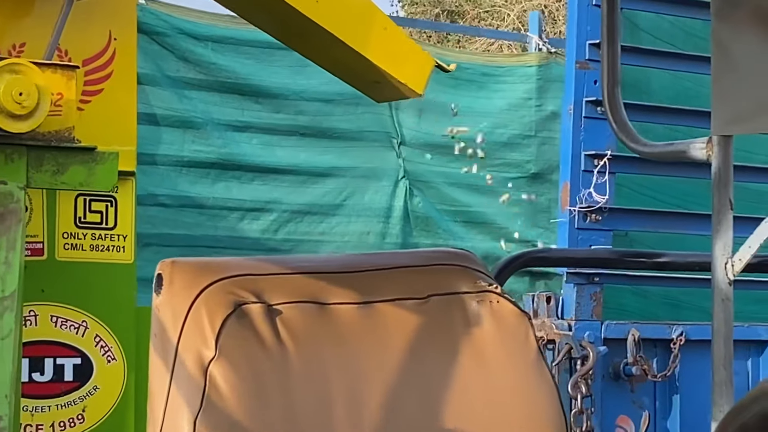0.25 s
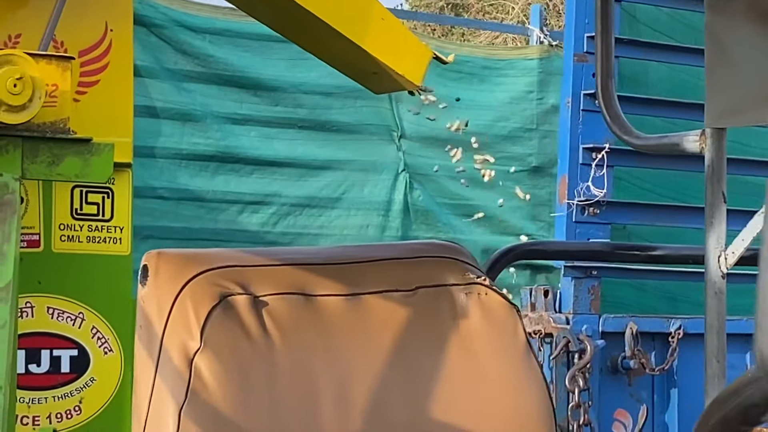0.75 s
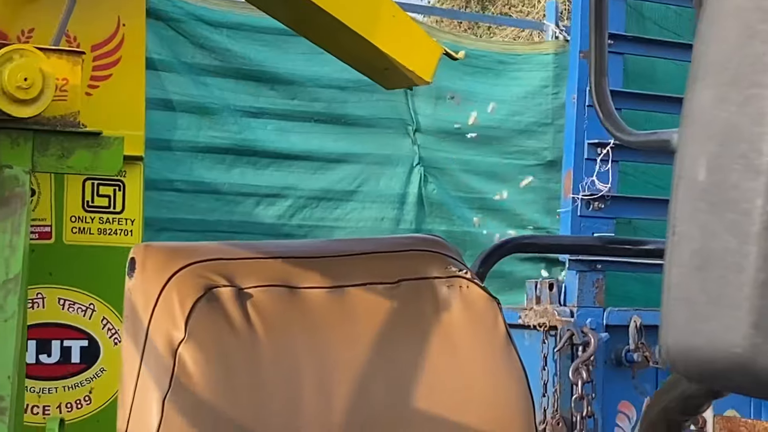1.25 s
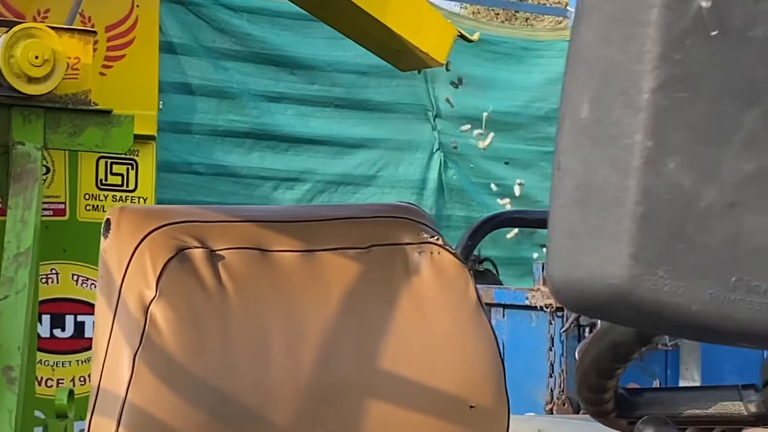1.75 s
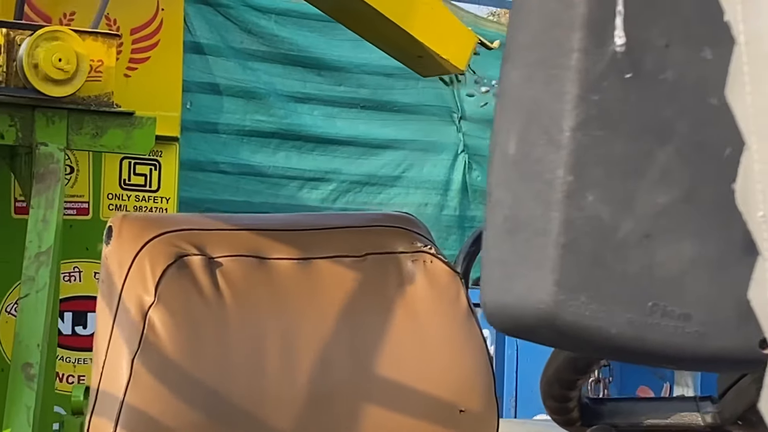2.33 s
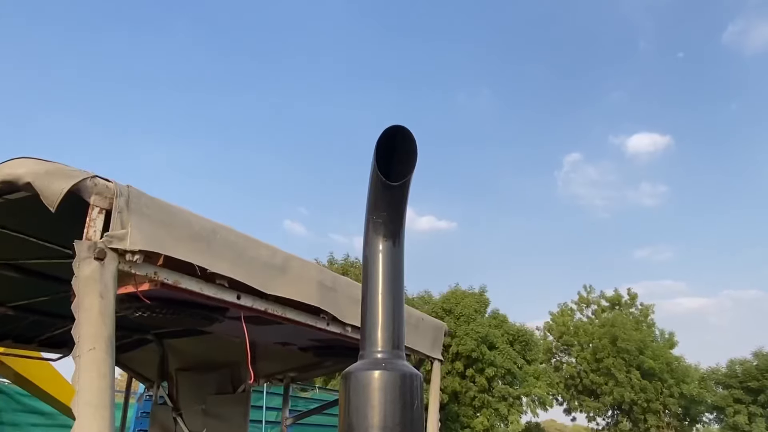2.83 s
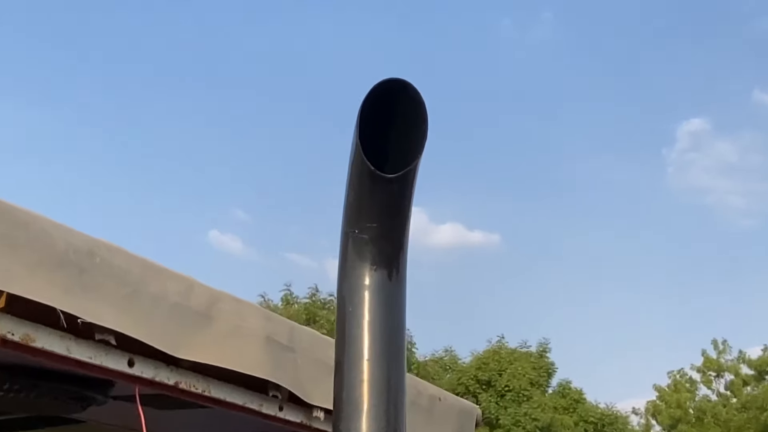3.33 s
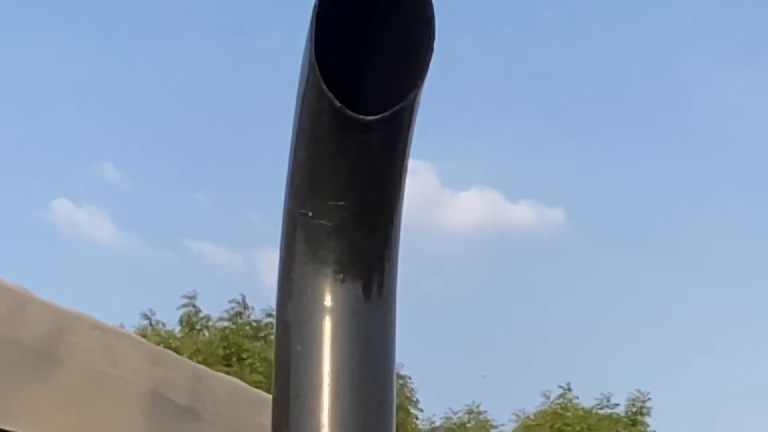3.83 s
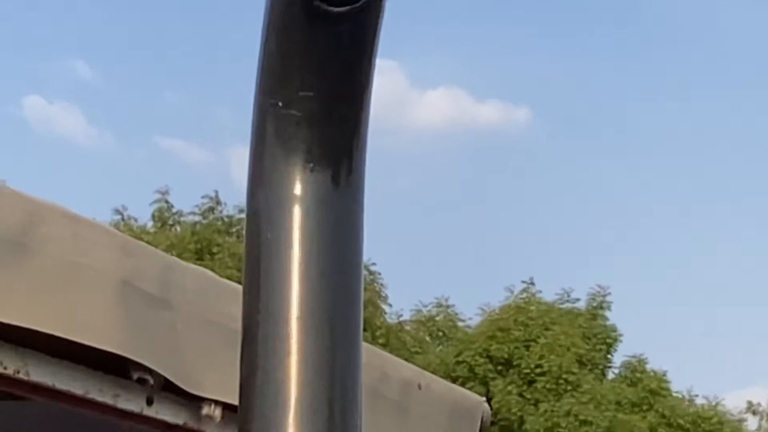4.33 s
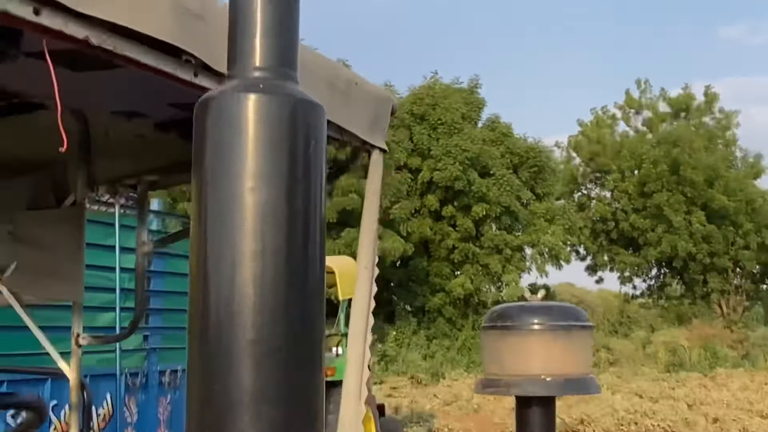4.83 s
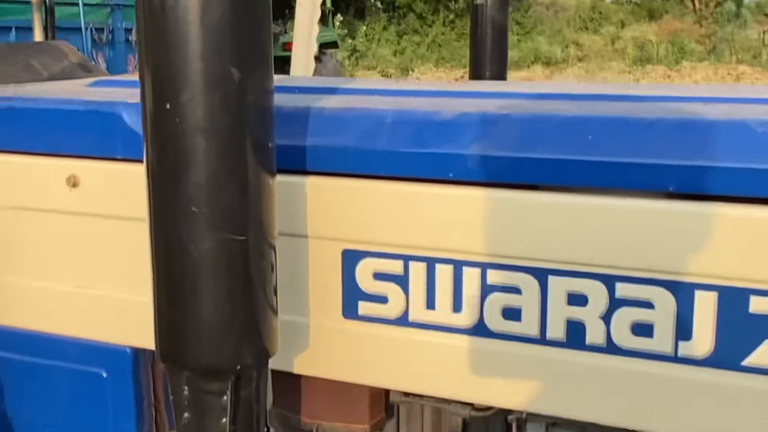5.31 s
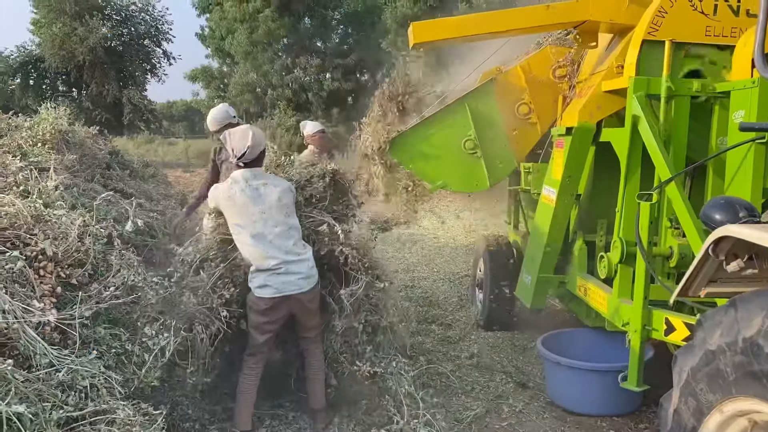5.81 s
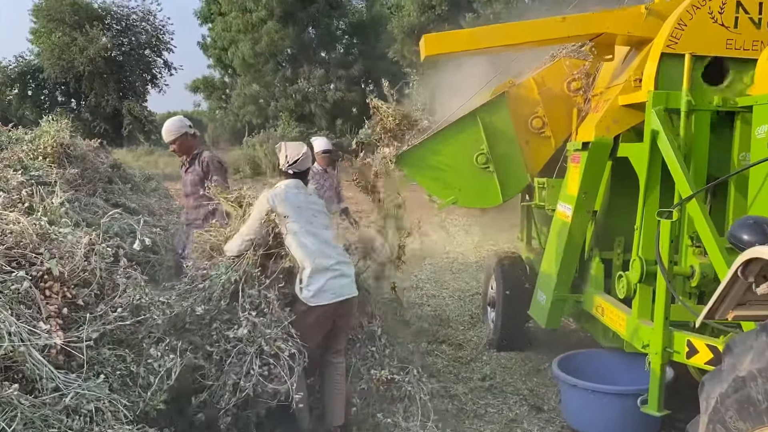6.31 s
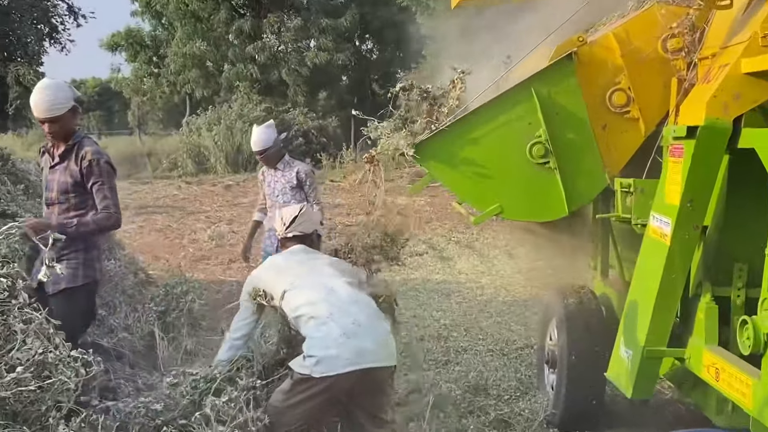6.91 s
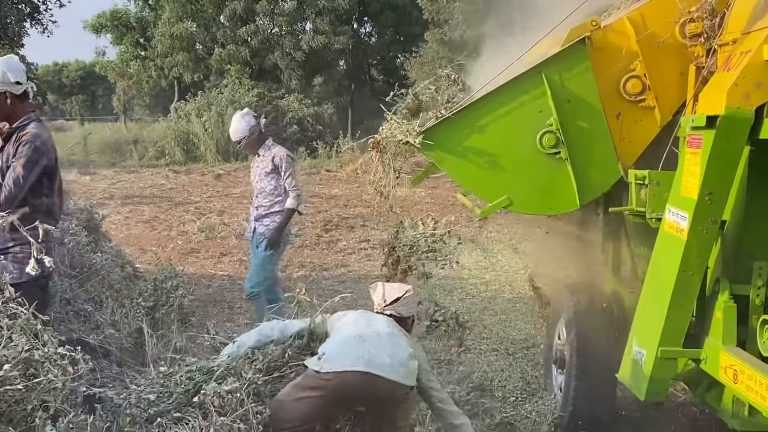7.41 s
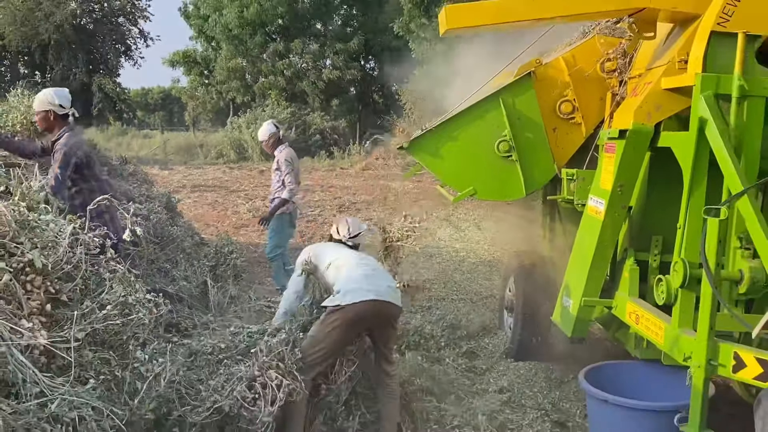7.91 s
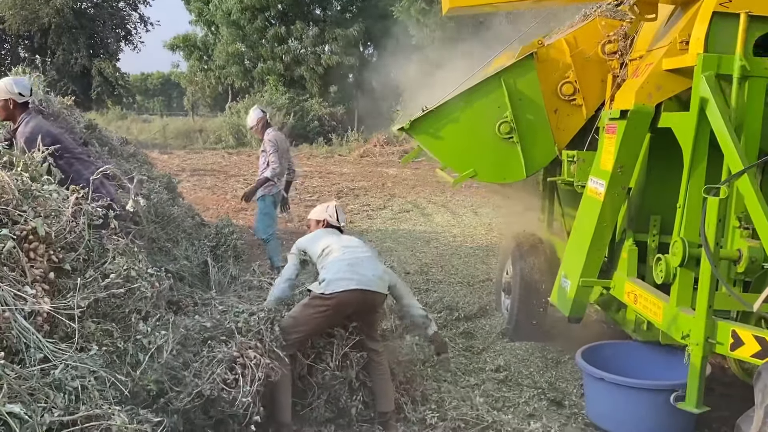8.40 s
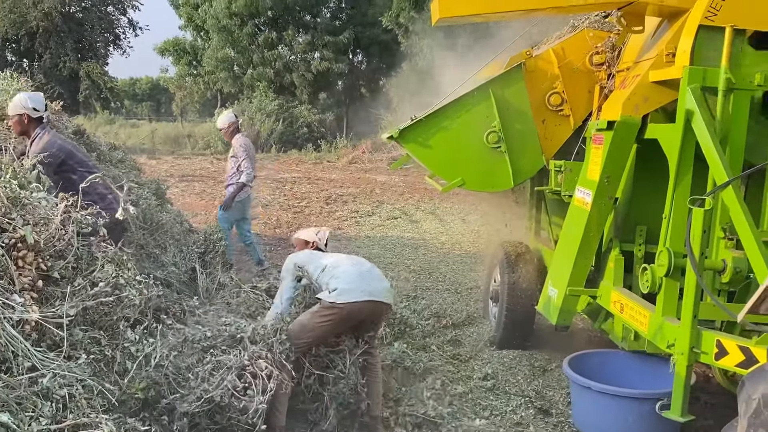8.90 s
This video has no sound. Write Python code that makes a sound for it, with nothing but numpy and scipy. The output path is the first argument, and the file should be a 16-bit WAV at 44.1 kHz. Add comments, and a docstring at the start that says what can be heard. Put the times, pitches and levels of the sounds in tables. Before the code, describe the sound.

A tractor diesel hammers under throbbing load while a crop thresher roars and hums, heard from three spots split by tiny gaps, dry stalks rustling late.

```python
"""A diesel tractor drives a crop thresher in a field, heard from three spots in turn with a short silence
between: beside the seat, near the exhaust stack, and out by the feed hopper. Three cylinders fire under a
throbbing load: each firing thumps the exhaust pipe, knocks the engine block, puffs hiss and ticks the valve gear.
The blower hums a little below twice the firing rate and beats with it.
Drum and crop are patchy noise with ringing sheet metal; near the end, armfuls of dry stalks rustle."""
import sys
import numpy as np
from scipy import signal
from scipy.fft import rfft, irfft, next_fast_len
from scipy.io import wavfile
from scipy.ndimage import uniform_filter1d, map_coordinates

SR = 44100
rng = np.random.default_rng(int(sys.argv[2]) if len(sys.argv) > 2 else 0)


def bounce(signal):
    """Save signal as a 16-bit WAV file at the path given by the first command-line argument."""
    frames = np.transpose(np.atleast_2d(signal))
    limited = np.clip(frames, -1, 1)
    pcm = np.round(limited * 32767).astype(np.int16)
    wavfile.write(sys.argv[1], SR, pcm)


N = 403515
RUN_UP_S = .3  # the machines already run this long before each spot is heard


def amp(db):
    """Turn decibels into a plain gain."""
    return 10 ** (np.asarray(db) / 20)


def unit(x):
    """Scale a signal to an rms of one."""
    return x / np.sqrt(np.mean(x ** 2) + 1e-20)


def along(table, column, hz):
    """Read one column of a table that starts with pitch, on a log pitch axis."""
    rows = np.array(table)
    return np.interp(np.log(hz + 1), np.log(rows[:, 0] + 1), rows[:, column])


def curves(rows, t):
    """Draw one curve over time for each column after the first."""
    seconds, *columns = np.transpose(rows)
    return [np.interp(t, seconds, column) for column in columns]


def wobble(t, rate):
    """A smooth random curve with rate knots a second."""
    position = (t - t[0]) * rate
    knots = rng.standard_normal(len(t) // 200)
    return map_coordinates(knots, [position])


def noise(t):
    """Two unrelated noises: the direct and the diffuse part."""
    return rng.standard_normal((2, len(t)))


def filtered(x, response):
    """Colour x with a complex response of frequency."""
    length = next_fast_len(x.shape[-1] + SR // 4)
    spectrum = rfft(x, length) * response(np.fft.rfftfreq(length, 1 / SR))
    return irfft(spectrum, length)[..., :x.shape[-1]]


def modes(table, spot):
    """Response of a body with several resonances: each rings on after a push, with alternating sign."""
    def resonance(f, row):
        centre_hz, width_hz = row[:2]
        return amp(row[2 + spot]) * 1j * f * width_hz / (centre_hz ** 2 - f * f + 1j * f * width_hz)
    return lambda f: sum((-1) ** k * resonance(f, row) for k, row in enumerate(table))


# Resonances of the exhaust pipe, before mouth and silencer:
# pitch_hz, width_hz, seat_db, stack_db, hopper_db
PIPE_MODES = [(106.5, 10.0, -0.5, 0.2, -2.1), (63.7, 10.0, -8.7, -8.5, -13.6),
              (144.1, 42.5, -11.5, -11.1, -13.5), (136.8, 68.0, -12.3, -11.2, -14.0),
              (259.0, 10.0, -21.3, -21.7, -24.1)]
# Upper engine orders, carried by the chassis; levels are rms before the wobble:
# multiple of firing rate, seat_db, stack_db, hopper_db
CHASSIS_ORDERS = [(7, -33, -31, -35), (8, -38, -33, -48), (9, -31, -32, -32), (10, -38, -43, -37),
                  (11, -41, -41, -38), (12, -39, -40, -44), (13, -40, -39, -45), (14, -42, -44, -47),
                  (15, -43, -42, -43), (16, -40, -40, -41), (17, -44, -43, -44)]


def exhaust(t, firing, spot):
    """Each firing's pressure pulse rings the pipe; the mouth loses deep bass, the silencer cuts the top."""
    fired = np.diff(np.floor(firing), prepend=np.floor(firing[0]))
    size = amp(0.7 * wobble(t, 30.16)) / np.gradient(firing) / 2

    def pipe(f):
        mouth = (1j * f / 38 / (1 + 1j * f / 38)) ** 2
        silencer = 1 / (1 + (f / 199) ** 30)
        return modes(PIPE_MODES, spot)(f) * mouth * silencer

    upper = 0
    for row in CHASSIS_ORDERS:
        level = amp(row[1 + spot] + 2.6 * wobble(t, 4.03))
        upper = upper + level * np.cos(2 * np.pi * row[0] * (firing - .012))
    return filtered(fired * size, pipe) + np.sqrt(2) * upper


# Firings of a set size instead of a random one; each sound multiplies these by its own boost:
# time_s, ring_size_db, hiss_size_db
SET_FIRINGS = [(0.097, 5.5, 4), (0.626, 3, -3), (0.858, 2, -3), (1.023, 7.5, -3), (1.486, 3.5, -2),
               (2.014, 6, -1), (2.212, 1.5, 4.5), (3.069, -2, 2), (3.168, 7, 4), (3.367, 6, 2),
               (3.466, 4, -0.5), (3.532, 1, -2), (3.631, 3.5, 1), (3.863, 3.5, 1), (3.896, 4, 1.5),
               (4.095, 1.5, 2), (4.393, -2, 1), (4.459, 1.5, 2), (4.658, 3.5, -1), (4.856, 4.5, 2.5),
               (4.956, 4, 0), (6.609, 8, -3), (7.47, 7.5, -1), (8.297, 8, -3), (8.363, 6, -2),
               (8.562, 7, 2), (8.827, 9, -2)]


def burst(t, firing, column, rise, fall, scatter_db, boost, cylinder_db=(0, 0, 0)):
    """Envelope that swells before each firing and dies after it; rise and fall are in firing periods."""
    count = np.floor(firing + .25)  # the swell may begin a quarter period early
    since = firing - count
    shape = np.where(since < 0, np.exp(-(since / rise) ** 2), np.exp(-np.abs(since) / fall))
    size_db = scatter_db * rng.standard_normal(int(count[-1]) + 2)
    for row in SET_FIRINGS:
        if t[0] < row[0] < t[-1]:
            size_db[round(np.interp(row[0], t, firing))] = boost * row[column]
    which = count.astype(int)
    return unit(shape) * amp(size_db[which] + np.asarray(cylinder_db)[which % 3])


# Resonances of the engine block, relative levels: pitch_hz, width_hz, seat_db, stack_db, hopper_db
BLOCK_MODES = [(498, 53, -1, -4, -22), (677, 71, -16, 1.5, -8), (757, 71, -7, 2.5, -13),
               (1212, 107, -2, -0.5, 0), (1810, 65, 0, -0.5, 3), (1924, 29.6, 4, 2.5, 8.5),
               (2800, 1150, -26, -15.5, -22.5), (3330, 270, -36.5, -23, -50.5)]
# Each cylinder knocks in its own colour: pitch_hz, first_db, second_db, third_db
CYLINDER_COLOUR = [(480, 1.5, -4, 1.5), (720, -6, 4, -1), (1230, .7, -1.5, .7), (1342, 4, -7, -7),
                   (1800, 1, -.7, -.3), (5000, .3, .3, -.3)]
# Gain at each firing, one row each for seat, stack, hopper: ring_db, hiss_db
FIRING_GAIN = [(9.6, -13), (13.8, -1.5), (12.1, -24)]


def block_ring(t, firing, ring_db, spot):
    """A burst of noise at each firing shakes the block into its resonances, coloured by cylinder."""
    envelope = burst(t, firing, column=1, rise=0.084, fall=0.34, scatter_db=1.5, boost=0.56)
    rattle = noise(t) * amp(ring_db) * envelope
    cylinder = np.floor(firing + .25) % 3
    ring = 0
    for c in range(3):
        colour = lambda f: modes(BLOCK_MODES, spot)(f) * amp(along(CYLINDER_COLOUR, 1 + c, f))
        ring = ring + filtered(rattle * (cylinder == c), colour)
    return amp(FIRING_GAIN[spot][0]) * ring


# Gas ringing in the cylinder sinks in pitch as the piston falls; pitches before the random detune:
# start_hz, end_hz, glide_s
PING_GLIDE = (1960, 1725, .0035)
# Ping level against the block ring level: seat_db, stack_db, hopper_db
PING_LEVEL = [-6.5, -5, -10.5]


def ping(t, firing, ring_db, spot):
    """Ringing gas gives a short falling tone at each firing, at a slightly new pitch and phase."""
    start_hz, end_hz, glide_s = PING_GLIDE
    count = np.floor(firing + .25)
    # seconds since the ping began, a little before the firing
    since = np.maximum((firing - count + 0.0585) / np.gradient(firing, t), 0)
    detune, phase = rng.standard_normal((int(count[-1]) + 1, 2))[count.astype(int)].T
    cycles = end_hz * since + (start_hz - end_hz) * glide_s * (1 - np.exp(-since / glide_s))
    tone = np.sin(2 * np.pi * (cycles * (1 + 0.029 * detune) + phase))
    tone = tone * burst(t, firing, column=1, rise=0.066, fall=0.26, scatter_db=2.0, boost=1.8)
    return amp(ring_db + PING_LEVEL[spot]) * tone * [[1], [.5]]  # direct, diffuse


# Colour of the hiss at each firing: pitch_hz, gain_db
PUFF_COLOUR = [(300, 11), (1000, 6), (3500, -7), (5300, 5.5), (6300, 0), (7500, 7.5), (9500, -1),
               (15500, -12)]


def hiss_puffs(t, firing, hiss_db, spot):
    """Each firing lets out a puff of coloured noise."""
    envelope = burst(t, firing, column=2, rise=.09, fall=.27, scatter_db=2.3, boost=1.4)
    puffs = noise(t) * amp(hiss_db) * envelope
    return amp(FIRING_GAIN[spot][1]) * filtered(puffs, lambda f: amp(along(PUFF_COLOUR, 1, f)))


def struck(t, firing, hz):
    """Noise; a low tick also gets one sharp blow of either sign a firing, a little early or late."""
    x = noise(t)
    late = .03 * wobble(t, 30)  # in firing periods
    at = np.flatnonzero(np.diff(np.floor(firing + late)) > 0)
    # 28 dB above the noise, only for ticks below 1500 Hz
    x[0, at] += amp(28) * rng.choice([-1, 1], len(at)) * (hz < 1500)
    return unit(x)


# Exhaust bark and valve gear ticks, relative levels: pitch_hz, width_hz, seat_db, stack_db, hopper_db
TICK_MODES = [(700, 77, 6.5, 12, 4), (1260, 120, -19, 2, -6), (1345, 21, 19.5, 12, 19),
              (2250, 240, -6, 4, -10), (2630, 410, 0.2, 1, 3), (3420, 260, -6, 4.5, -17),
              (5320, 1300, -8, -3, -5), (7100, 1200, -4, -5, -14)]


def bark_and_ticks(t, firing, hiss_db, spot):
    """Each firing strikes the bark and tick resonances, each with its own strength."""
    ticks = 0
    for row in TICK_MODES:
        cylinder_db = [along(CYLINDER_COLOUR, 1 + c, row[0]) for c in range(3)]
        strike = struck(t, firing, row[0]) * amp(hiss_db)
        envelope = burst(t, firing, column=2, rise=0.1, fall=0.29, scatter_db=2.2, boost=0.84,
                         cylinder_db=cylinder_db)
        ticks = ticks + filtered(strike * envelope, modes([row], spot))
    return ticks


def knock(t, firing, ring_db, hiss_db, spot):
    """All that a firing sets off at the engine: block ring, ping, bark and ticks, and hiss."""
    ring = block_ring(t, firing, ring_db, spot) + ping(t, firing, ring_db, spot)
    return ring + bark_and_ticks(t, firing, hiss_db, spot) + hiss_puffs(t, firing, hiss_db, spot)


# Blade tone and overtones; levels are rms before the wobble:
# multiple of blade rate, seat_db, stack_db, hopper_db
BLADE_TONES = [(1, -20.1, -22.9, -16.2), (4, -38, -40, -31), (7, -38, -40, -38)]
# Low hum at blade rate minus firing rate, rms: seat_db, stack_db, hopper_db
BEAT_HUM = [-38, -39, -40]


def blower(t, blades, firing, spot):
    """Passing blades make a tone with weak overtones, and a hum where it mixes with the firing."""
    tones = amp(BEAT_HUM[spot]) * np.sin(2 * np.pi * (blades - firing))
    for row in BLADE_TONES:
        level = amp(row[1 + spot] + 0.24 * row[0] * wobble(t, 5.77))
        tones = tones + level * np.sin(2 * np.pi * row[0] * blades)
    return np.sqrt(2) * tones


# Basic colour of drum, blower air and crop, levels in dB per Hz: pitch_hz, seat_db, stack_db, hopper_db
CHURN_COLOUR = [(20, -58, -58, -58), (42, -57, -57, -56), (75, -46, -48, -46), (140, -47, -49, -46),
                (230, -47, -50, -45), (330, -49, -52, -48.3), (600, -54, -54, -53), (1000, -58, -58, -57),
                (1500, -60, -61, -60), (2300, -62, -63, -62), (4300, -68, -70, -69), (7500, -72, -73, -72),
                (12000, -76, -78, -76), (15500, -81, -83, -82)]
# Thresher sheet metal kept ringing by the drum, one resonance each: pitch_hz
CASING_PITCH = [395, 500, 752, 1255, 1342, 1490, 1570, 2680, 3120, 5250]
# Same resonances in the same order, relative levels: width_hz, seat_db, stack_db, hopper_db
CASING_RING = [(30, -23, -21, -17), (40, -11, -12, -21), (35, -5.5, -31, -2), (45, -4, -8.5, -6),
               (23.7, -1.5, -2, -2), (20, -25, -45, -54), (16, -7, -16, -24), (120, -11.5, -19, -17.5),
               (100, -15, -21, -38), (300, -18, -21.5, -26)]


def thresher(t, treble_db, roar_db, spot):
    """Drum and crop roar in patches; roar and treble wander apart, and the casing rings."""
    z = signal.stft(noise(t), nperseg=512)[2]
    patches = rng.standard_normal(z.shape[1:])
    patches = uniform_filter1d(patches, size=8, axis=0)  # smooth over pitch, then over time
    patches = uniform_filter1d(patches, size=6, axis=1)
    roar = signal.istft(z * amp(1.31 * unit(patches)), nperseg=512)[1][:, :len(t)]
    colour = lambda f: amp(along(CHURN_COLOUR, 1 + spot, f)) * np.sqrt(SR / 2)
    high = lambda f: 1 / (1 + (1500 / (f + 1)) ** 2)
    low_gain = amp(roar_db + 0.39 * wobble(t, 7.24))
    low = low_gain * filtered(roar, lambda f: colour(f) * (1 - high(f)))
    top_gain = amp(treble_db + 0.92 * wobble(t, 4.85))
    top = top_gain * filtered(roar, lambda f: colour(f) * high(f))
    shaking = noise(t) * amp(1.86 * wobble(t, 40))
    casing = filtered(shaking, modes(np.c_[CASING_PITCH, CASING_RING], spot))
    return low + top + amp(-4) * casing


# Dry stalks lifted or thrown by the armful, rms level at the peak: peak_s, level_db, half_length_s
STALK_ARMFULS = [(6.3, -41, .12), (6.65, -36, .15), (7.16, -37, .02), (7.72, -31.5, .13),
                 (8.702, -34, 0.12), (8.85, -38, .1)]
# Colour of the rustle, relative: pitch_hz, level_db
RUSTLE_COLOUR = [(2500, -30), (5000, -1), (9000, -2), (15500, -8)]


def stalks(t):
    """Dry stalks rubbing: crackly hiss that swells and fades with each armful."""
    swell = sum(amp(db) * np.exp(-((t - peak) / half) ** 2) for peak, db, half in STALK_ARMFULS)
    crackle = noise(t) * amp(3 * wobble(t, 150))
    return swell * unit(filtered(crackle, lambda f: amp(along(RUSTLE_COLOUR, 1, f))))


# Left-right likeness of the diffuse sound, 1 is the same (no unit): pitch_hz, seat, stack, hopper
LIKENESS = [(150, .99, 1, .99), (375, .91, .94, .83), (700, .72, .93, .72), (900, .5, .75, .38),
            (1300, .65, .89, .72), (1500, .28, .65, .37), (1700, .4, .83, .63), (1900, .8, .85, .8),
            (2200, .93, .95, .68), (3100, .6, .6, .85), (4500, .4, .4, .5)]
# Phase lead of left over right, in half cycles: pitch_hz, seat, stack, hopper
PHASE_LEAD = [(50, -.02, 0, -.04), (150, -.06, .01, -.13), (375, -.08, .05, -.22), (700, -.24, .16, -.58),
              (900, -.18, .16, -.5), (1300, -.4, .21, -.95), (1500, -.5, .2, -1.17),
              (1700, -.1, .25, -1.45), (1900, -.05, .12, -1.47), (2250, 0, 0, -1.75), (2550, 0, 0, -1.85),
              (3300, 0, 0, -2)]
# Further lead that puts two treble bands in opposite phase: pitch_hz, lead in half cycles
TREBLE_FLIP = [(7550, 0), (8650, -1), (9400, -1), (10450, -2), (11600, -2), (12750, -3), (13650, -3),
               (14550, -4)]
# Left level minus right level: pitch_hz, seat_db, stack_db, hopper_db
SIDE_LEAN = [(150, -.2, 0, -.2), (500, 0, 0, .5), (700, -1, 1, -2), (1000, -.5, 2, -2), (1300, 2, 2, -4),
             (1800, 3.5, 1, -3), (2200, 1, 0, -1), (3000, 0, 0, 0)]
# Above this pitch the sides share one sound, apart from lead and lean: seat_hz, stack_hz, hopper_hz
NARROW_ABOVE = [2300, 2300, 3300]
# For a while the treble opens wide as well: start_s, end_s, up_to_hz
WIDE_TIMES = [(2.74, 3.15, 7400), (5.54, 6.5, 6200), (8.3, 9.15, 5800)]


def stereo(t, pair, tones, spot):
    """Mix direct, diffuse and tones to left and right; lead and lean are split between the sides."""
    def matrix(f, narrow_hz):
        turn = np.arccos(along(LIKENESS, 1 + spot, f)) / 2 * (f < narrow_hz)
        half_cycles = along(PHASE_LEAD, 1 + spot, f) + np.interp(f, *np.transpose(TREBLE_FLIP))
        side = np.exp(.5j * np.pi * half_cycles) * amp(along(SIDE_LEAN, 1 + spot, f) / 2)
        shares = np.array([np.cos(turn), np.sin(turn), np.ones_like(f)])
        return np.array([shares * side, shares * [[1], [-1], [1]] / side])

    def mixed(narrow_hz):
        return filtered(np.vstack([pair, tones]), lambda f: matrix(f, narrow_hz)).sum(axis=1)

    out = mixed(NARROW_ABOVE[spot])
    for start, end, top_hz in WIDE_TIMES:
        if t[0] < start < t[-1] - RUN_UP_S:
            share = uniform_filter1d(1. * ((start < t) & (t < end)), size=2000, mode="nearest")
            out = out + share * (mixed(top_hz) - out)
    return out


# Steady speeds at seat, stack, hopper; counts are those at the start:
# start_s, end_s, firing_hz, firings counted, blade_hz, blade passes counted
SPOT_SPEEDS = [(0, 2.688, 30.253, 13.059, 56.525, .54), (2.74, 5.488, 30.203, 14.078, 56.434, .43),
               (5.54, 9.15, 30.2033, 12.722, 56.43, .15)]
# The load throbs, one row each for seat, stack, hopper: throb_hz, first_peak_s, ring_swing_db, hiss_swing_db
LOAD_THROB = [(3.68, .085, 3, 3), (3.72, 2.78, 2, 3.5), (3.72, 5.615, 0, 1.5)]
# Slow levels as the listening point moves, before the throb; one table for each spot:
# time_s, block_ring_db, firing_hiss_db, drum_roar_change_db, drum_treble_change_db
SLOW_LEVELS = [
    [(0, -27, -28.5, -1, 0), (.8, -26.5, -26.5, 0.5, -1), (1.8, -26.5, -28, 0, -0.1),
     (2.69, -24.5, -24.5, 0, 0.3)],
    [(2.74, -28.5, -30, 2, -1.5), (3.3, -25.5, -29.5, -0.5, -1.8), (4, -23, -31, -1.2, -2.1),
     (4.9, -24.5, -28.5, .3, -2), (5.1, -24.5, -31.5, -0.8, 1.5), (5.49, -25.5, -40, -2, 1.5)],
    [(5.54, -25, -32, 3.5, 0.6), (6, -25.5, -35, 0.5, -1.2), (6.9, -26.5, -29, 0.3, -0.7),
     (7.45, -24.5, -31, -1.2, -0.2), (7.9, -28, -30, 1.3, -0.9), (9.15, -26.5, -29, .3, -1.8)],
]
# Fade in after each silence, counted from the start of the spot: start_s, length_s
SPOT_FADE = (-0.0054, 0.026)


def scene():
    """Run the machines at each spot in turn and lay the three stretches on one timeline."""
    out = np.zeros((2, N + 2 * SR))
    for spot, (start, end, firing_hz, fired, blade_hz, passed) in enumerate(SPOT_SPEEDS):
        t = np.arange(round((start - RUN_UP_S) * SR), round(end * SR)) / SR
        firing = fired + firing_hz * (t - start)
        blades = passed + blade_hz * (t - start)
        throb_hz, peak, ring_swing_db, hiss_swing_db = LOAD_THROB[spot]
        throb = np.cos(2 * np.pi * throb_hz * (t - peak))
        ring_db, hiss_db, roar_db, treble_db = curves(SLOW_LEVELS[spot], t)
        engine = knock(t, firing, ring_db + ring_swing_db * throb, hiss_db + hiss_swing_db * throb, spot)
        pair = engine + thresher(t, treble_db, roar_db, spot) + stalks(t)
        tones = exhaust(t, firing, spot) + blower(t, blades, firing, spot)
        fade = np.clip((t - start - SPOT_FADE[0]) / SPOT_FADE[1], 0, 1) if spot else 1
        out[:, SR + round(t[0] * SR):][:, :len(t)] += stereo(t, pair, tones, spot) * fade
    return out[:, SR:SR + N]


def record(dry):
    """Round off the loudest peaks softly, then cut everything above 15850 Hz."""
    soft = dry / (1 + np.abs(dry / .97) ** 8) ** (1 / 8)
    return filtered(soft, lambda hz: hz < 15850)


dry = scene()
out = record(dry)
bounce(out)
```